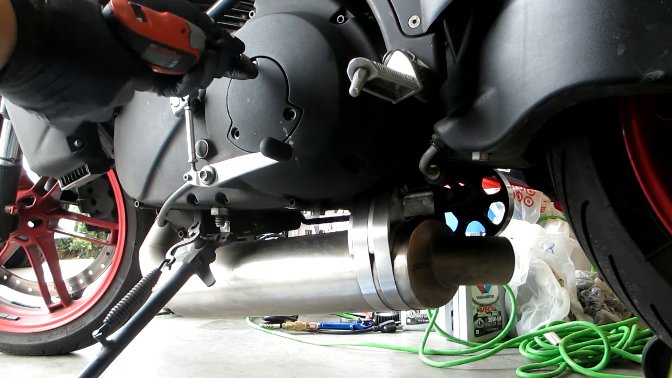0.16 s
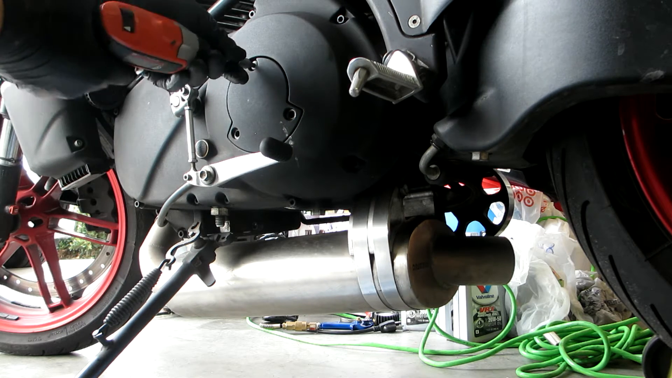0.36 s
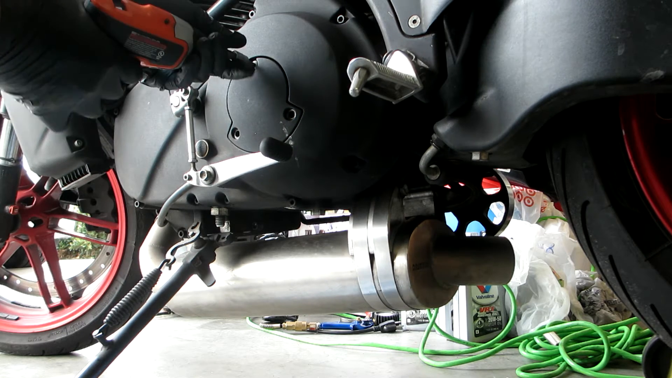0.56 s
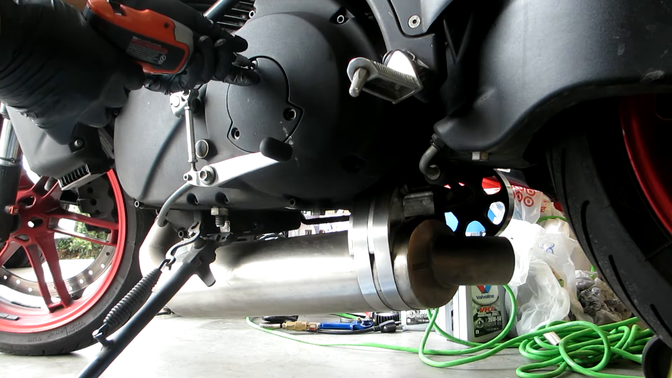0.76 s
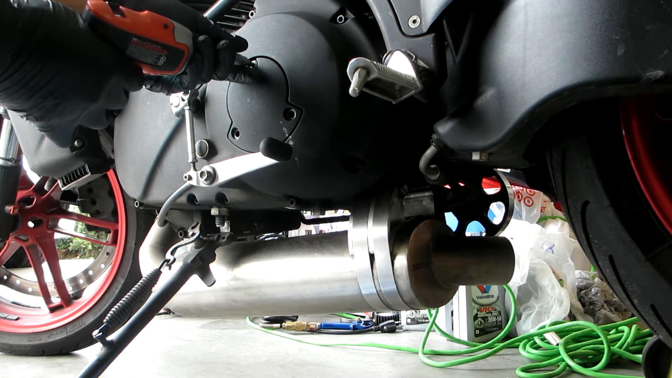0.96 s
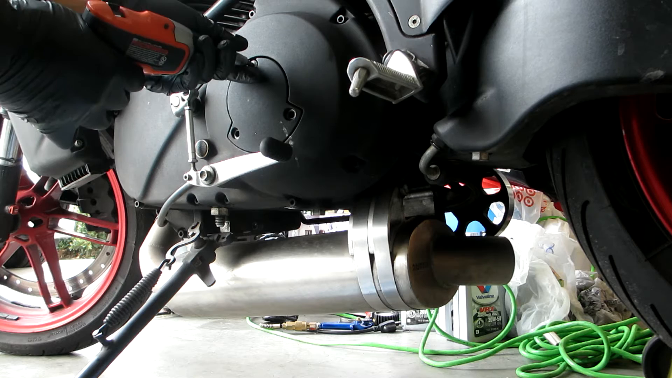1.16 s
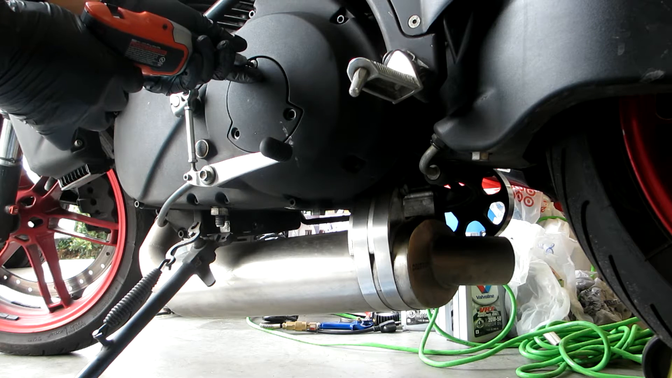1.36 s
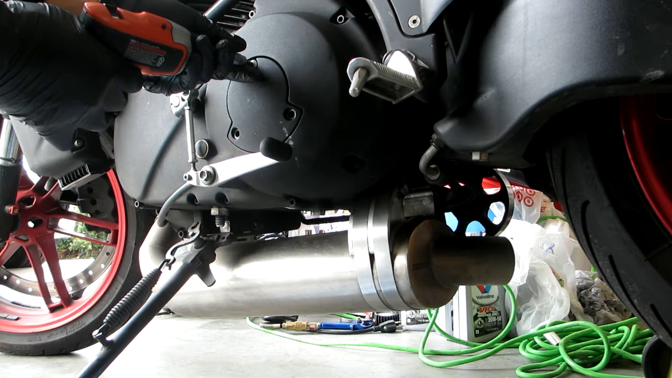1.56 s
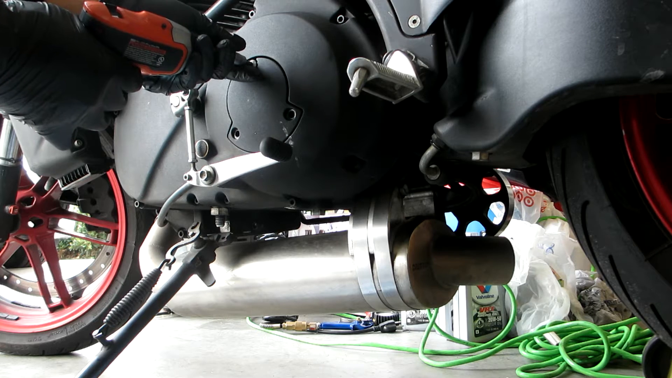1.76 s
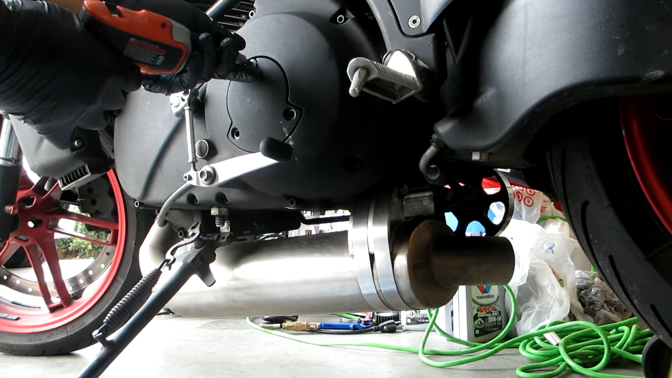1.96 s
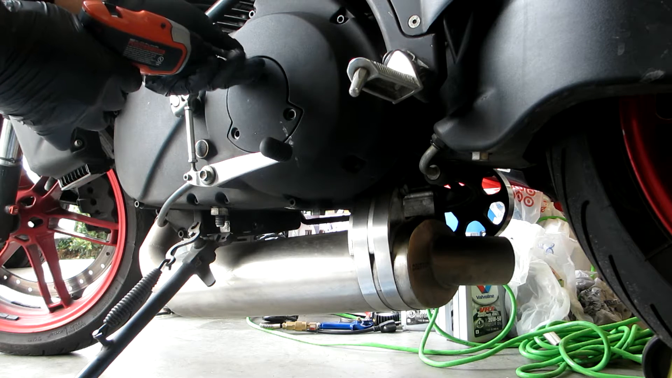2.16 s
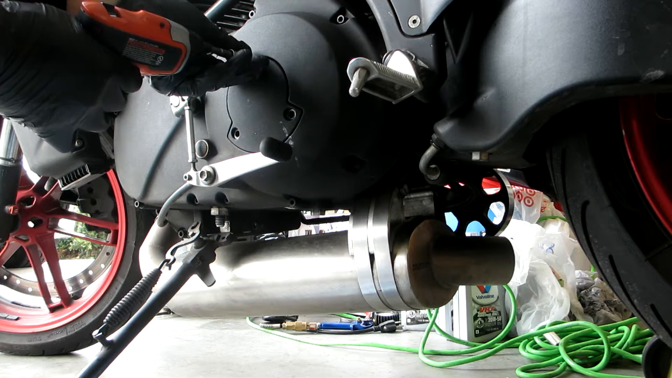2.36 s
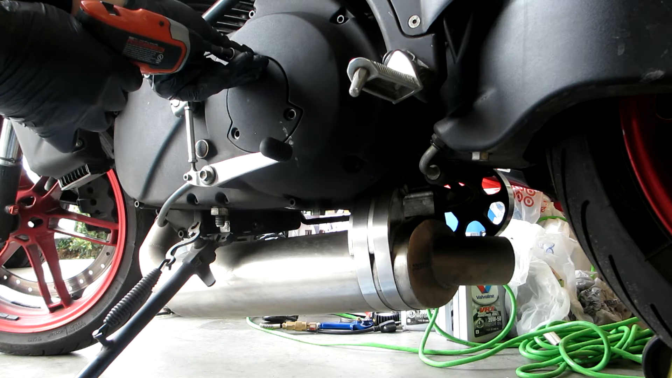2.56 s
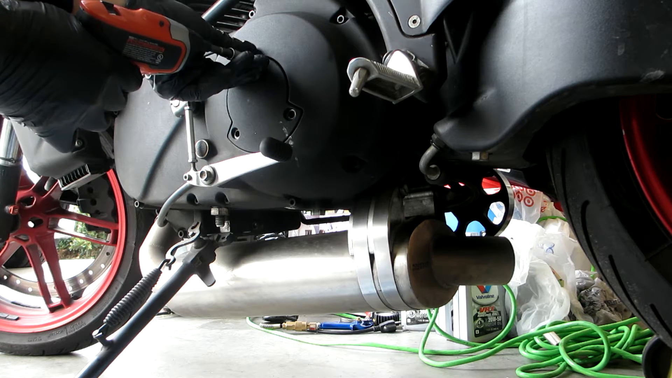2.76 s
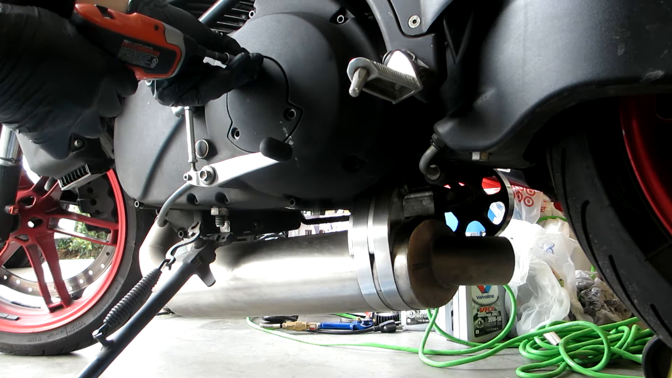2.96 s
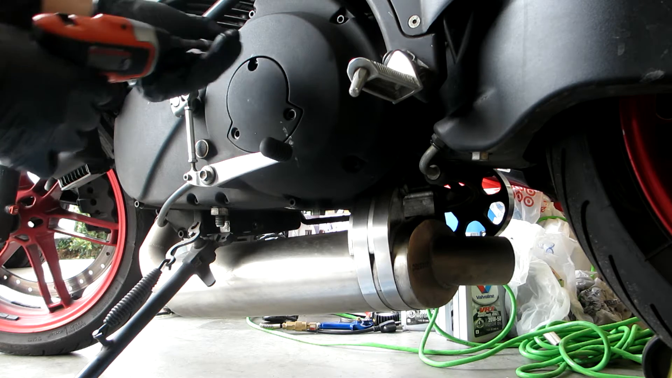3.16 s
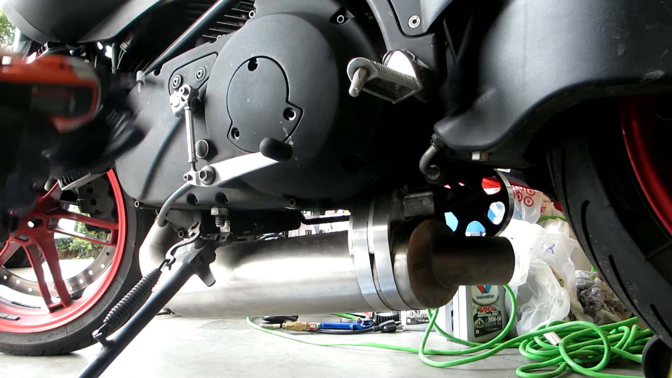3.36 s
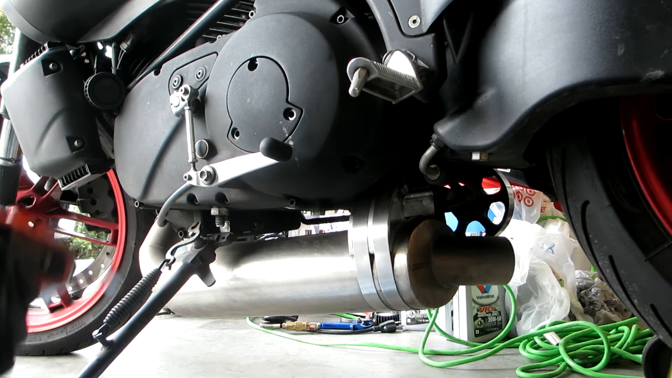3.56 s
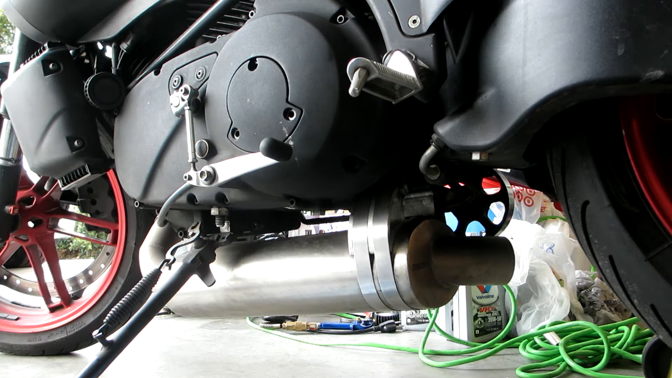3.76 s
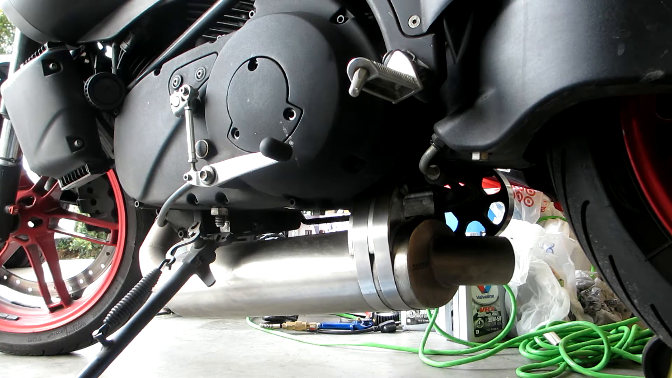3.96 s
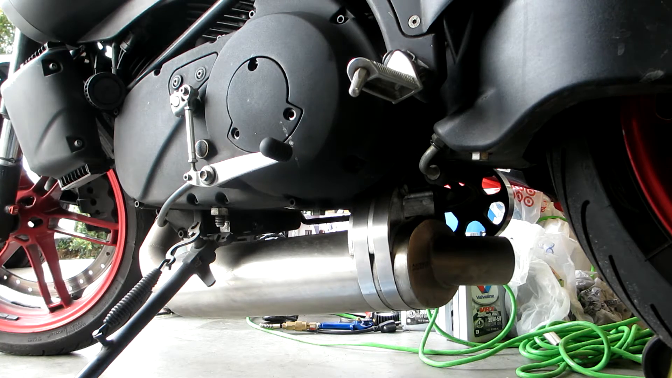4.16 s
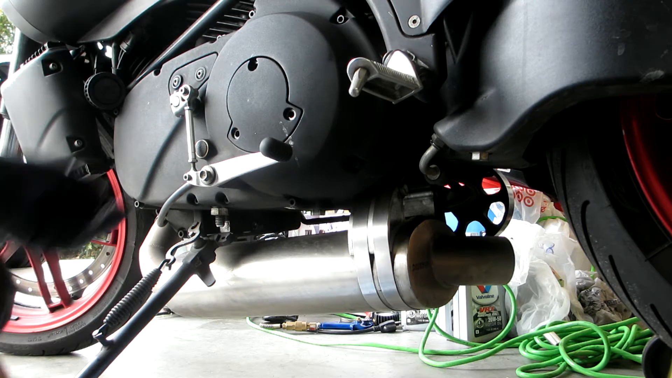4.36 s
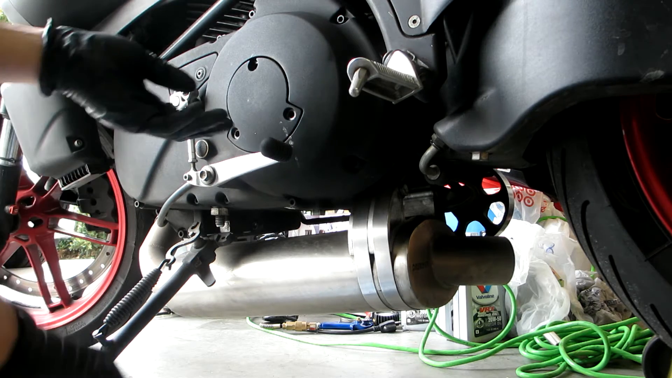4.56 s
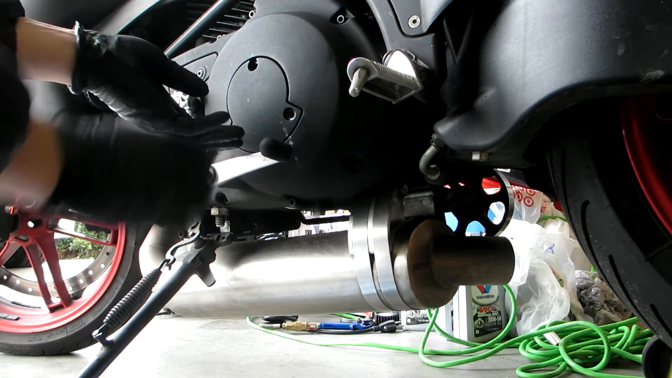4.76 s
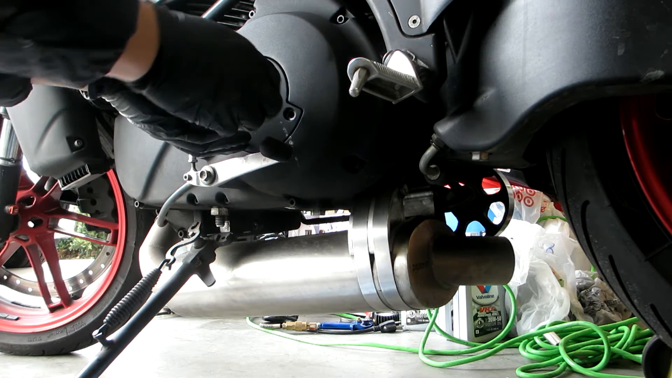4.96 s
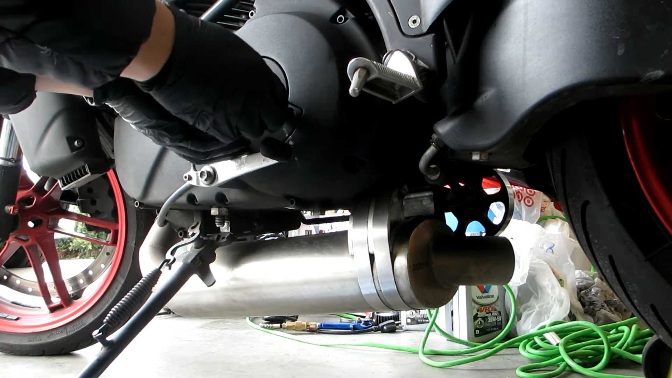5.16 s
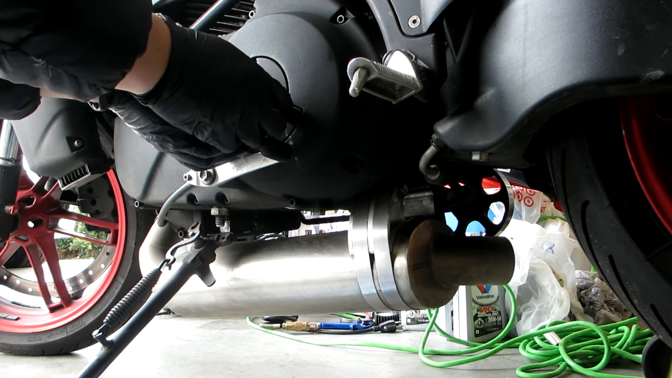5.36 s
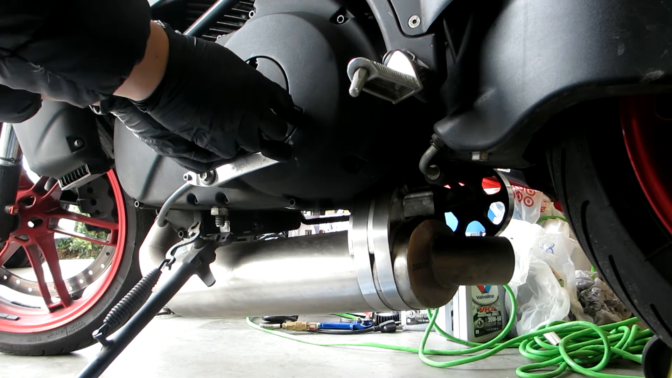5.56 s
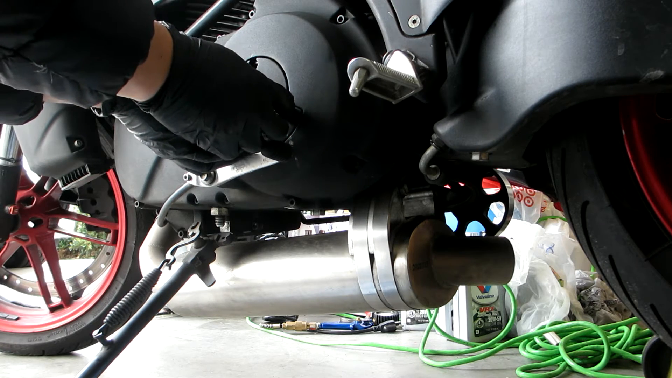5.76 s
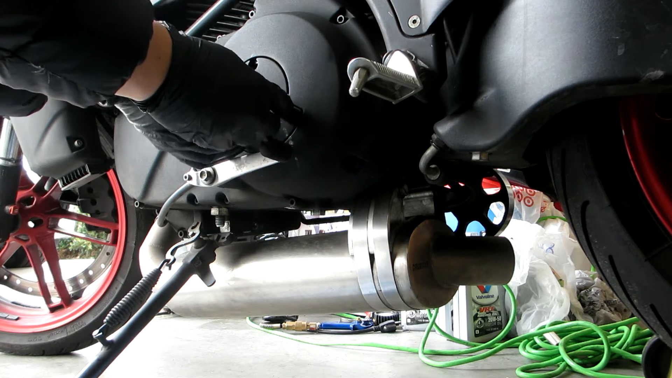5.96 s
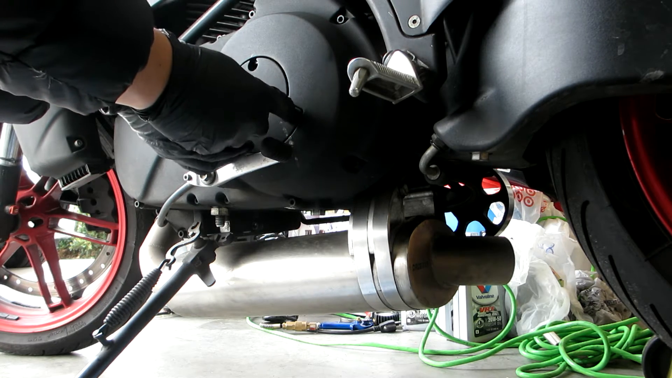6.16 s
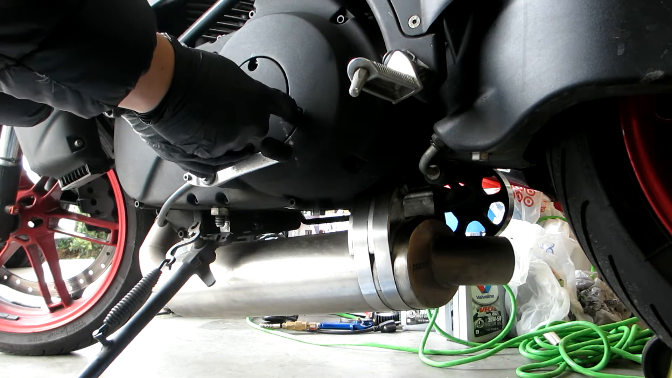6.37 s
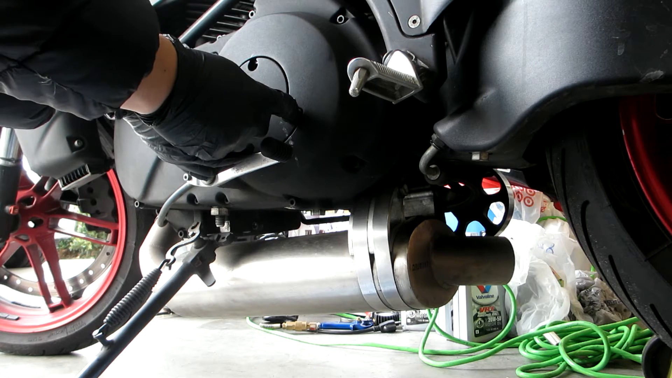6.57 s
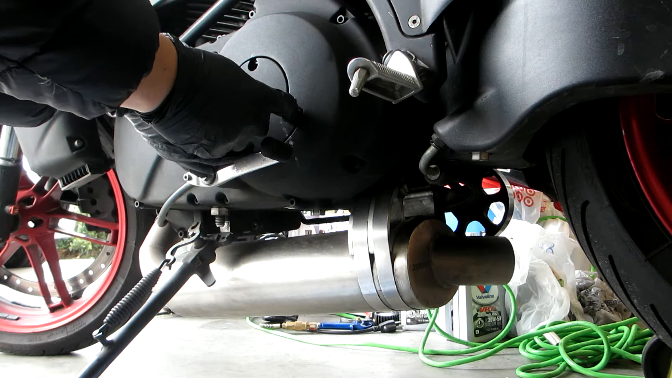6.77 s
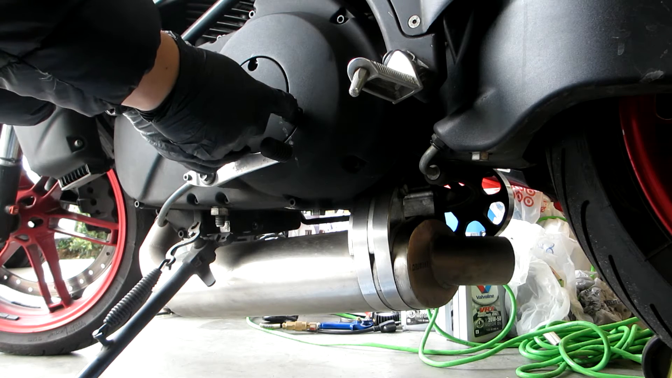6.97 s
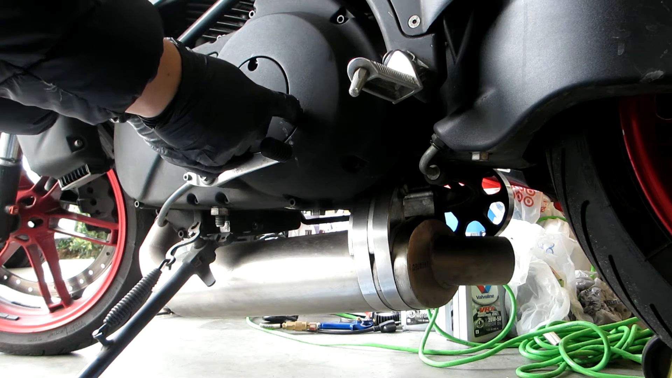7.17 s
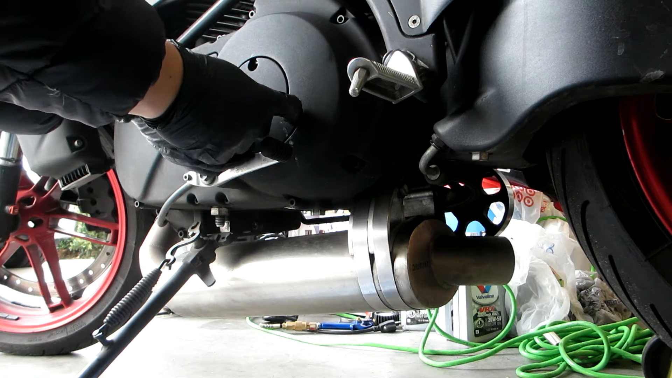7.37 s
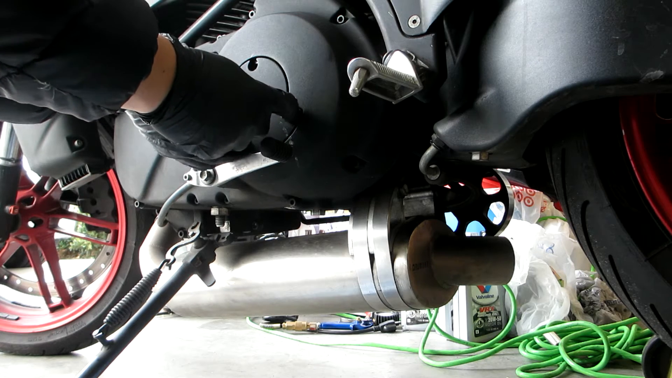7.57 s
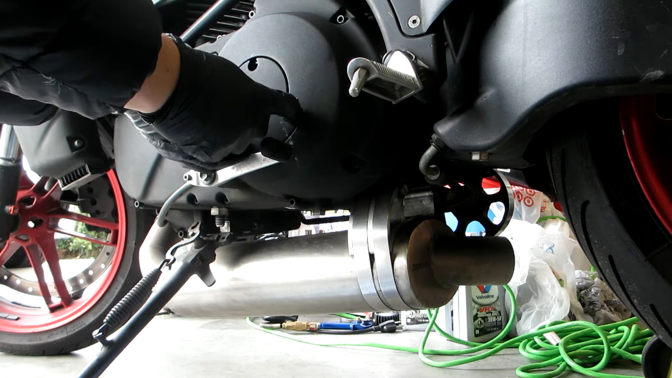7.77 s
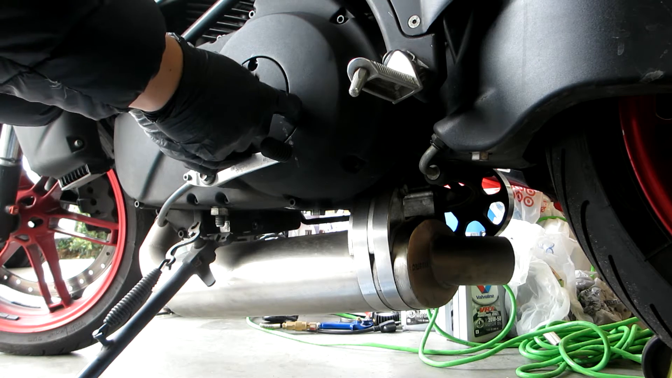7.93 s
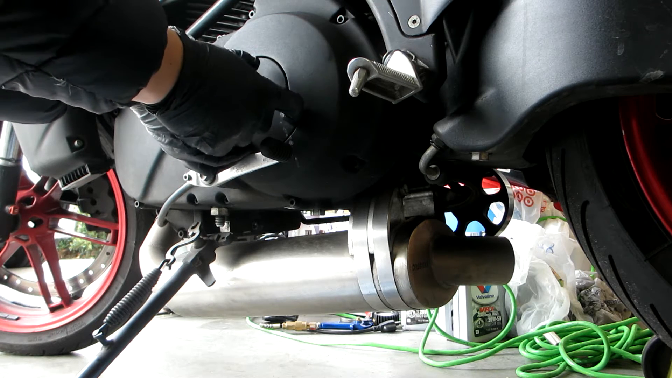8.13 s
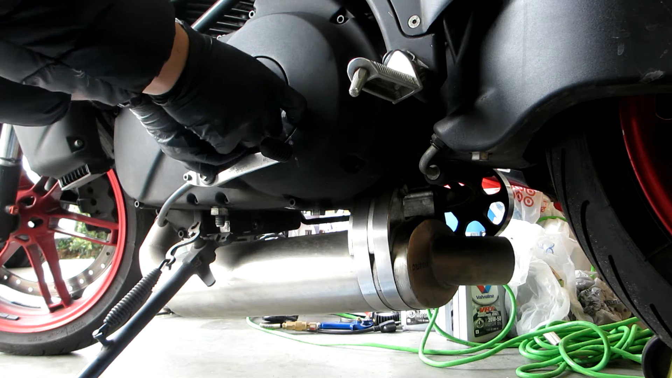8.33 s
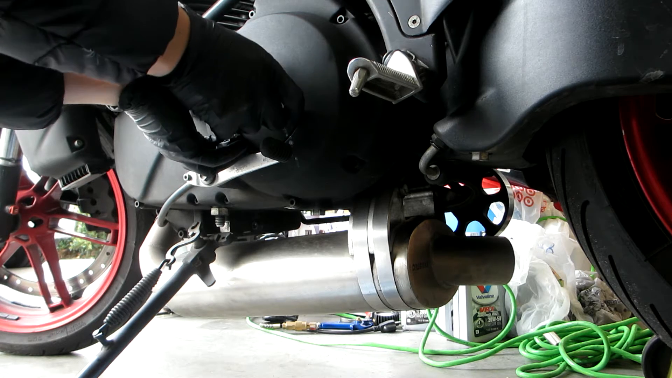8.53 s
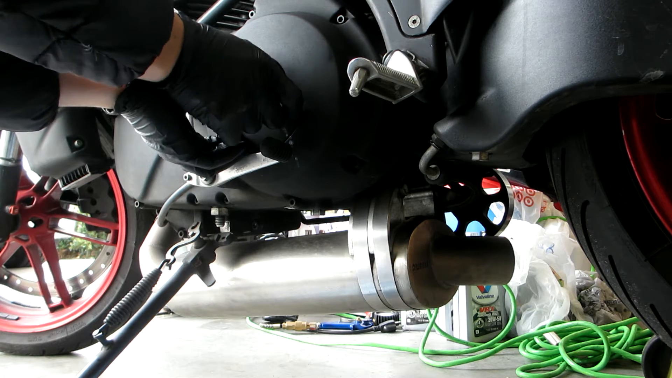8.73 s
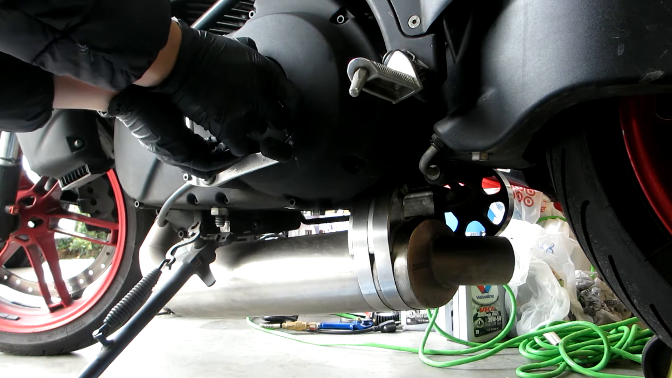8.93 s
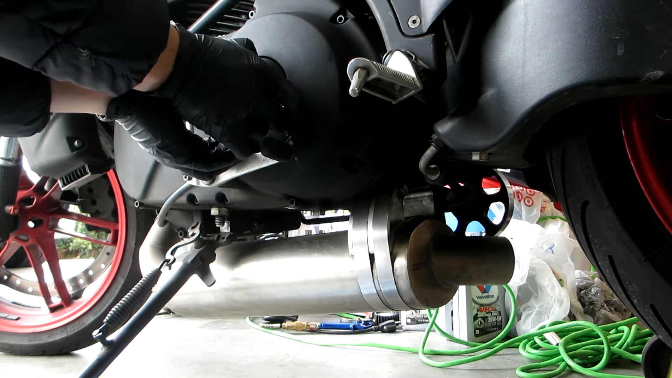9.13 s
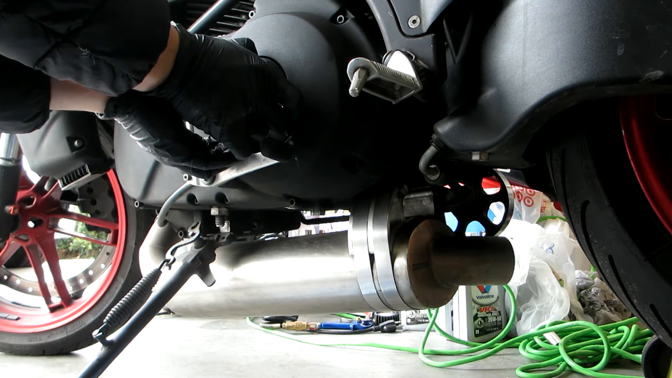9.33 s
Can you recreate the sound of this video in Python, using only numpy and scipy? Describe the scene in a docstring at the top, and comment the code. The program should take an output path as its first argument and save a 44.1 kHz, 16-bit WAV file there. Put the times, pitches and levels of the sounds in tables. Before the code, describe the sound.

A small cordless screwdriver clicks into a screw and whines for under three seconds, then is set down with clatter; later faint ticking and one dull knock.

```python
"""Unscrewing an engine cover

In a garage, a small cordless screwdriver backs a screw out of a motorcycle's engine cover.
The bit clicks (ringing modes), the motor whines (sines that follow its speed) and hisses (shaped noise).
It coasts down; cloth rubs, and the tool lands on the floor with ringing blows. A faint ticking follows.
Gloved hands knock the cover; distant traffic (slowly swelling noise) comes through the open door.
"""
import sys
import numpy as np
from scipy import signal
from scipy.fft import rfft, irfft
from scipy.io import wavfile
from scipy.ndimage import map_coordinates

SR = 44100
rng = np.random.default_rng(int(sys.argv[2]) if len(sys.argv) > 2 else 0)


def wav_record(signal):
    """Record a signal, one row per channel, as 16-bit PCM in the file named by sys.argv[1]."""
    frames = np.transpose(np.atleast_2d(signal))
    bounded = np.clip(frames, -1, 1)
    # unit amplitude maps onto the largest positive 16-bit level
    quanta = np.round(bounded * 32767).astype(np.int16)
    wavfile.write(sys.argv[1], SR, quanta)


N = 414540  # length of the scene in samples


def undb(db):
    """Turn decibels into a gain."""
    return 10 ** (np.asarray(db) / 20)


def response(points, hz):
    """Read the gain of a (frequency [Hz], level [dB]) curve at the given frequencies."""
    f, db = np.transpose(points)
    # the tiny offset avoids the logarithm of zero
    return undb(np.interp(np.log(hz + 0.0014), np.log(f), db))


def colour(x, points):
    """Filter a sound by a (frequency [Hz], level [dB]) curve."""
    count = x.shape[-1]
    return irfft(rfft(x) * response(points, np.fft.rfftfreq(count, 1 / SR)), count)


def cut(x, hz, kind, order=2):
    """Keep only the lows ("low") or only the highs ("high") with a Butterworth filter."""
    return signal.sosfilt(signal.butter(order, hz, kind, fs=SR, output="sos"), x)


def unit(x):
    """Scale a sound to an rms of 1."""
    return x / np.sqrt(np.mean(x ** 2))


def walk(rate):
    """Drift smoothly between random values, `rate` new ones per second, with a spread near 1."""
    steps = rng.standard_normal(4000)
    return map_coordinates(steps, [np.arange(N) / SR * rate], order=2, mode="wrap")


def fade(t, t60):
    """Die away exponentially, by 60 dB in t60 seconds."""
    return np.exp(-np.log(1000) * t / t60)


def swell(middle_s, length_s):
    """Rise and fall smoothly: 1 at the middle, about 0.14 one length to either side."""
    return np.exp(-2 * ((np.arange(N) / SR - middle_s) / length_s) ** 2)


def strokes(rows):
    """Gain of a series of movements that each swell and die away."""
    return np.sqrt(sum((undb(db) * swell(s, length)) ** 2 for s, length, db in rows))


def diffuse(count, alike_hz, treble_share):
    """Noise at two close microphones: alike in the bass, only partly shared in the treble."""
    left, other = rfft(rng.standard_normal((2, count)))
    bass = 1 / (1 + (np.fft.rfftfreq(count, 1 / SR) / alike_hz) ** 3)
    alike = np.clip(bass + treble_share * (1 - bass), 0, 1)
    right = alike * left + np.sqrt(1 - alike ** 2) * other
    return irfft([left, right], count)


def scattered(count):
    """Noise from close by, partly scattered off the machine's panels."""
    return diffuse(count, alike_hz=2600, treble_share=.62)


def grains(spread_db):
    """Dense tiny contacts of uneven size, with an rms of 1."""
    # a new random size every 16 samples
    size = np.repeat(rng.standard_normal(N // 16 + 1), 16)[:N]
    return unit(scattered(N) * undb(spread_db * size))


def add(track, s, x):
    """Mix a short sound into a track at a given time."""
    i = int(s * SR)
    track[:, i:i + x.shape[-1]] += x[..., :N - i]


def ring(modes):
    """A struck body rings as a sum of fading sines, one per mode."""
    t = np.arange(SR // 4) / SR
    body = 0
    for k, (hz, db, t60) in enumerate(modes):
        sign = (-1) ** k
        body = body + sign * undb(db) * fade(t, t60) * np.sin(2 * np.pi * hz * t)
    return body


# noise spectrum of the road: (frequency [Hz], level [dB])
TRAFFIC_SPECTRUM = [(20, -28), (35, -9.5), (50, -13.5), (110, -11), (160, -18.5), (300, -26.5),
                    (600, -33.5), (1250, -33.5), (1450, -41), (1700, -40.5), (2100, -53.5), (4000, -68),
                    (8000, -73), (13000, -68)]


def traffic(right_db):
    """Distant road rumble that swells a little, over a faint hiss."""
    noise = colour(diffuse(N, alike_hz=2240, treble_share=0), TRAFFIC_SPECTRUM)
    rumble = cut(noise, 249, "low", order=1)
    hiss = noise - rumble
    sides = undb([[0], [right_db]])
    return (rumble * undb(2.0 * walk(5)) + hiss * undb(.5 * walk(1.324))) * sides


def whistle(hz, db):
    """A very faint, steady electrical whistle whose pitch trembles slightly."""
    return undb(db) * np.sin(2 * np.pi * np.cumsum(hz + 25 * walk(80)) / SR)


def blows(hits, modes, low_hz, crack_db, crack_t60, rattle_db, rattle_t60, scuff_t60,
          rebound_s, rebound_db):
    """Each blow cracks, rings the body, shakes loose parts and rebounds once; soft contact is duller."""
    out, body = np.zeros((2, N)), ring(modes)
    t = np.arange(len(body)) / SR
    noise_fade = undb(crack_db) * fade(t, crack_t60) + undb(rattle_db) * fade(t, rattle_t60)
    for s, db, bright_hz, scuff_db in hits:
        tone = cut(body, bright_hz, "low")
        tone = tone / np.abs(tone).max()
        for delay, drop_db in [(0, 0), (rebound_s, rebound_db)]:
            noise = cut(scattered(len(t)), low_hz, "high")
            noise = unit(cut(noise, bright_hz * 0.24, "low"))
            hit = tone + noise * noise_fade
            # grit adds a bright scuff
            grit = scattered(len(t))
            scuff = (cut(grit, 14000, "high") + .5 * cut(grit, 1900, "high")) * fade(t, scuff_t60)
            add(out, s + delay, undb(drop_db) * (undb(db) * hit + undb(scuff_db) * scuff))
    return out


# how the bit rings: (frequency [Hz], level [dB], time to fade by 60 dB [s])
BIT_RING = [(762, -2.5, 0.027), (970, -2, 0.055), (1141, 5.5, 0.029), (1430, 4.5, 0.016), (2010, -3, 0.021),
            (2825, -0.5, 0.014), (3460, -18, 0.022), (4150, -20, .012)]
# blows of the bit: (time [s], level [dB], contact brightness [Hz], gritty scuff level [dB])
BIT_BLOWS = [(.2628, -27, 5000, -22), (.2654, -16, 4030, -21), (.2692, -14.5, 4970, -38),
             (5.595, -25.5, 2600, -68), (6.359, -30, 990, -73), (6.61, -28, 1170, -75),
             (9.38, -35, 4000, -70)]


def bit_clicks():
    """The bit clicks into the screw head, and a few faint taps with the same short ring come later."""
    return blows(BIT_BLOWS, BIT_RING, low_hz=605, crack_db=-10.5, crack_t60=0.015, rattle_db=-27,
                 rattle_t60=0.21, scuff_t60=0.021, rebound_s=0.0075, rebound_db=-20)


# the trigger is pressed and let go (s)
TRIGGER_ON_S, TRIGGER_OFF_S = .43, 2.986
# speed without load (turns per second) and time constant of the spin-up (s)
FREE_HZ, SPIN_UP_S = 368.9, .058
# coasting: time constant of the drag (s), and steady braking by friction
COAST_S, FRICTION_HZ_PER_S = 1.5, 415
# the tight screw takes a share of the speed, eases with a time constant, then leaves its thread
LOAD_SHARE, LOAD_EASE_S, SCREW_OUT_S = .085, .6, 2.9


def motor():
    """Speed (Hz), load and starting current (0-1): spin up, gain as the screw eases, coast to a stop."""
    t = np.arange(N) / SR
    driven = np.clip(t, TRIGGER_ON_S, TRIGGER_OFF_S) - TRIGGER_ON_S
    coasting = np.maximum(t - TRIGGER_OFF_S, 0)
    inrush, load = np.exp(-driven / SPIN_UP_S), np.exp(-driven / LOAD_EASE_S)
    speed = FREE_HZ * (1 - inrush) * (1 - LOAD_SHARE * load)
    braking = FRICTION_HZ_PER_S * COAST_S
    speed = np.maximum((speed + braking) * np.exp(-coasting / COAST_S) - braking, 0)
    return speed, load, inrush


# lines of the gear train: (multiple of the motor speed, level [dB])
GEAR_LINES = [(.8, -52), (1, -51.5), (1.64, -52), (3, -44.5), (4, -53.5), (5, -65), (6, -51.5),
              (6.91, -53.5), (9, -54), (9.54, -53)]
# resonance of the plastic housing: (frequency [Hz], level [dB])
HOUSING_CURVE = [(150, -35), (300, -8.5), (365, 1), (480, -7), (600, 2), (730, 7.5), (870, 14.5),
                 (1000, 14), (1100, -0.5), (1400, -4), (1800, 9), (2200, -3.5), (2550, -3), (4000, -3.5)]


def gear_whine(speed, turn, pace, load):
    """Gear lines follow the motor speed and sweep through the housing's resonances."""
    # the twice-a-turn line grows as the screw loosens and the bit wobbles
    wobble_db = -44.5 - 8 * load
    whine = 0
    for multiple, db in list(GEAR_LINES) + [(2, wobble_db)]:
        flutter_db = np.sqrt(multiple) * walk(14)
        line = np.sqrt(2) * np.sin(multiple * turn) * undb(db + flutter_db)
        whine = whine + line * response(HOUSING_CURVE, multiple * speed)
    # the load of the screw holds the whine down
    return whine * pace ** 0.26 * undb(-1 - 9.5 * load)


def mirrored(x):
    """Add the reflection off the cover, which ripples the spectrum; ripples move as the hand shifts."""
    t = np.arange(N) / SR
    # the lag (s) grows as the tool backs out
    lag = .000905 + .000004 * (t + 2 * walk(1.5))
    reflection = np.array([map_coordinates(side, [(t - lag) * SR], order=3) for side in x])
    return x + undb(-13) * reflection


# noise spectrum of the brushes: (frequency [Hz], level [dB])
BRUSH_SPECTRUM = [(3000, -43), (4900, -39.5), (5600, -32.5), (7200, -31.5), (7800, -30.5), (8800, -29.5),
                  (9900, -23), (10900, -26.5), (11700, -23.5), (12300, -25.5), (14000, -22.5),
                  (15000, -24.5), (15700, -31), (16000, -62)]


def brush_hiss(turn, pace, inrush):
    """Brushes rub and hiss, and the starting current makes them spark."""
    # the hiss throbs with the gear carrier (.8 of the motor speed) and flickers with the brush contact
    throb = 1 + 0.11 * np.sin(.8 * turn)
    flicker = undb(0.62 * walk(70))
    hiss = mirrored(colour(grains(spread_db=2.5) * throb * flicker, BRUSH_SPECTRUM))
    rubbing = pace ** 1.94 * undb(0.2)
    sparking = inrush * pace ** .5 * undb(-14)
    return hiss * (rubbing + sparking)


# noise spectrum of the gears: (frequency [Hz], level [dB])
GEAR_SPECTRUM = [(150, -54), (300, -39), (520, -35), (680, -21.5), (800, -20), (1000, -21.5), (1200, -28.5),
                 (1400, -28), (1850, -23.5), (2200, -32.5), (2800, -28.5), (3200, -33.5), (4500, -39.5),
                 (8000, -52)]


def gear_rattle(turn, pace, load, inrush):
    """Gear teeth rattle, throbbing once a turn, and the starting current jolts them."""
    rattle = colour(grains(spread_db=2) * (1 + 0.36 * np.sin(turn)), GEAR_SPECTRUM)
    running = pace ** 0.98 * undb(-3 - 4 * load)
    jolt = inrush * undb(-4)
    return rattle * (running + jolt)


# noise spectrum of the thread: (frequency [Hz], level [dB])
THREAD_SPECTRUM = [(700, -32), (1200, -26.5), (1900, -30.5), (2200, -30.5), (2600, -25), (3100, -38.5),
                   (5000, -39), (9000, -36)]
# the screw scrapes as it breaks free and as it leaves its hole: (middle [s], length [s], level [dB])
SCREW_SCRAPES = [(.53, 0.057, -3), (.72, 0.35, -10), (2.97, 0.18, -11)]


def thread_rasp(pace):
    """The thread rasps less and less as the screw comes out, with extra scrapes."""
    t = np.arange(N) / SR
    rasp = colour(grains(spread_db=3.5), THREAD_SPECTRUM) * undb(1.55 * walk(22.2))
    engaged = np.clip((SCREW_OUT_S - t) / (SCREW_OUT_S - TRIGGER_ON_S), 0, 1)
    return rasp * (pace * engaged * undb(.5) + strokes(SCREW_SCRAPES))


def screwdriver(slack_s):
    """The motor's speed, load and starting current drive whine, hiss, rattle and thread rasp together."""
    t = np.arange(N) / SR
    speed, load, inrush = motor()
    pace = speed / FREE_HZ
    # uneven load shakes the speed, which smears the high lines most
    speed = speed * (1 + .003 * walk(60))
    turn = 2 * np.pi * np.cumsum(speed) / SR
    sound = gear_whine(speed, turn, pace, load) + brush_hiss(turn, pace, inrush)
    sound = sound + gear_rattle(turn, pace, load, inrush) + thread_rasp(pace)
    # nothing sounds until the gears have taken up their slack
    return sound * (t > TRIGGER_ON_S + slack_s)


# noise spectrum of cloth: (frequency [Hz], level [dB])
CLOTH_SPECTRUM = [(300, -38.5), (1000, -36), (2500, -46), (4500, -59.5), (8000, -64), (13000, -57.5),
                  (16000, -61)]
# strokes of sleeve and glove: (middle [s], length [s], level [dB])
CLOTH_STROKES = [(3.6, .2, -5.5), (3.9, 0.32, 6.5), (4.25, 0.36, 6.5), (4.63, 0.085, 3), (4.9, .17, 1),
                 (7.98, 0.05, -8), (8.25, 0.12, 0), (8.48, .16, 2), (8.74, 0.17, 3.5), (9.19, 0.13, -12)]


def cloth_rubs():
    """Sleeves and gloves rub: dense tiny contacts that flutter within each stroke."""
    rub = colour(grains(spread_db=1), CLOTH_SPECTRUM) * undb(2.1 * walk(35))
    return rub * strokes(CLOTH_STROKES)


# the arm swings down: (middle [s], length [s], level [dB])
ARM_SWING = [(3.95, 0.31, -51)]


def arm_swish():
    """The swinging arm swishes: a narrow band of noise, highest in pitch where the arm is fastest."""
    swish_hz = 1830 + 1250 * swell(middle_s=3.88, length_s=0.12)
    carrier = np.sin(2 * np.pi * np.cumsum(swish_hz) / SR)
    swish = unit(cut(rng.standard_normal(N), 233, "low") * carrier)
    return swish * strokes(ARM_SWING)


# how the tool rings: (frequency [Hz], level [dB], time to fade by 60 dB [s])
TOOL_RING = [(194, -12.5, 0.063), (260, -20, 0.034), (496, -6, 0.034), (625, -1.5, 0.037),
             (720, -0.5, 0.028), (908, 3.5, 0.03), (1190, -4, 0.047), (1360, -5.5, 0.032),
             (1840, -5, 0.0066), (2230, -9, 0.024), (2990, -10.5, 0.028), (3640, -9, 0.0082)]
# the tool scrapes on the floor: (middle [s], length [s], level [dB])
FLOOR_SCRAPES = [(4.075, .05, -36.5), (4.16, 0.074, -41)]


def floor_scrapes():
    """Tiny uneven contacts with the floor keep the tool ringing as it scrapes along."""
    drag = signal.fftconvolve(grains(spread_db=9.5), ring(TOOL_RING)[None], axes=1)[:, :N]
    drag = unit(cut(drag, 450, "high"))
    return drag * undb(2 * walk(60)) * strokes(FLOOR_SCRAPES)


# blows of the tool: (time [s], level [dB], contact brightness [Hz], gritty scuff level [dB])
TOOL_BLOWS = [(4.116, -28, 1500, -62), (4.145, -26, 1500, -60), (4.2001, -5, 6600, -24),
              (4.2013, -3.5, 3520, -18), (4.2225, -7, 1410, -28), (4.2555, -21, 1000, -33),
              (4.332, -17, 2010, -30), (4.393, -14.5, 9600, -36), (4.4545, -14.5, 1190, -41),
              (4.492, -26, 900, -50), (4.506, -24.5, 2000, -35)]


def tool_laid_down():
    """The tool knocks on the floor several times, and its body rings."""
    return blows(TOOL_BLOWS, TOOL_RING, low_hz=149, crack_db=-7.5, crack_t60=0.026, rattle_db=-29,
                 rattle_t60=0.25, scuff_t60=0.054, rebound_s=.0145, rebound_db=-14.5)


# ring of a tick: (frequency [Hz], level [dB], time to fade by 60 dB [s])
TICK_RING = [(2100, -13, .012), (2700, -9, .012), (5520, -14.5, 0.017), (6000, -16, 0.011)]
# the ticks of one cycle: (time into the cycle [s], level before gain and accent [dB])
TICKS_IN_CYCLE = [(0, -55), (.0762, -49), (0.1253, -49.5), (.2007, -45)]
# when the faint ticking is heard, and the length of its cycle (s)
TICKING_FROM_S, TICKING_TO_S, TICK_CYCLE_S = 5.506, 7.78, .2503


def ticks(gain_db):
    """Tiny dry ticks with a short high ring, four to a cycle."""
    out, t = np.zeros((2, N)), np.arange(SR // 40) / SR
    ping = ring(TICK_RING)[:len(t)]
    for start in np.arange(TICKING_FROM_S, TICKING_TO_S, TICK_CYCLE_S):
        for offset, db in TICKS_IN_CYCLE:
            s = start + offset
            if s < TICKING_TO_S:
                # the ticking starts harder, then settles
                accent_db = 15 * np.exp((TICKING_FROM_S - s) / 0.053)
                noise = diffuse(len(t), alike_hz=2500, treble_share=.2)
                snap = cut(noise, 10500, "high") * fade(t, 0.011)
                add(out, s, undb(db + gain_db + accent_db) * (snap + .8 * ping))
    return out


# how the engine cover rings: (frequency [Hz], level [dB], time to fade by 60 dB [s])
COVER_RING = [(276, -11, 0.11), (414, -4, 0.074), (487, -21.5, 0.5), (550, -4, 0.033), (690, -1, 0.015),
              (834, -0.5, 0.038), (882, -22, 0.17), (945, -10.5, 0.031), (1180, -15.5, 0.017),
              (2050, -25, 0.017), (2900, -25, 0.014)]
# blows on the cover: (time [s], level [dB], contact brightness [Hz], gritty scuff level [dB])
COVER_BLOWS = [(7.5412, -3.5, 2150, -68), (7.5465, -14, 2200, -72), (8.482, -27.5, 500, -75)]


def cover_knocks():
    """Gloved hands tap and knock the cover, which rings."""
    return blows(COVER_BLOWS, COVER_RING, low_hz=200, crack_db=-40, crack_t60=0.012, rattle_db=-34,
                 rattle_t60=0.13, scuff_t60=.03, rebound_s=0.017, rebound_db=-16)


def garage(x, tail_db, tail_t60):
    """The walls add a short, dull tail."""
    t = np.arange(SR * 3 // 4) / SR
    tail = diffuse(len(t), alike_hz=2600, treble_share=0) * fade(t, tail_t60)
    # the walls answer only after 8 ms
    tail = tail * (t > .008)
    tail = cut(tail / np.linalg.norm(tail[0]), 7600, "low", order=1)
    return x + undb(tail_db) * signal.fftconvolve(x, tail, axes=1)[:, :N]


# the right microphone faces away from the work: (frequency [Hz], level against the left [dB])
SHADOW_CURVE = [(100, -10), (400, -4), (1000, -7), (2500, -9.5), (6000, -11), (12000, -13), (16000, -23.5)]


def scene():
    """The work is close and to the left; traffic lies behind it."""
    work = whistle(hz=12420, db=-80.5) + bit_clicks() + screwdriver(slack_s=0.011)
    work += cloth_rubs() + arm_swish() + floor_scrapes() + tool_laid_down()
    work += ticks(gain_db=0.5) + cover_knocks()
    left, right = garage(work, tail_db=-11.5, tail_t60=0.32)
    return np.array([left, colour(right, SHADOW_CURVE)]) + traffic(right_db=-4.0)


def record(dry):
    """The right channel is inverted and slightly late; loud peaks are rounded and the top is cut."""
    lag_s = 6e-5
    # turning the phase of each frequency delays the sound
    delay = np.exp(-2j * np.pi * np.fft.rfftfreq(N, 1 / SR) * lag_s)
    right = -irfft(rfft(dry[1]) * delay, N)
    pair = np.array([dry[0], right])
    rounded = pair / (1 + (pair / .92) ** 4) ** .25
    # steep low-pass at 16100 Hz
    return signal.sosfilt(signal.ellip(10, .2, 70, 16100, fs=SR, output="sos"), rounded)


dry = scene()
out = record(dry)
wav_record(out)
```